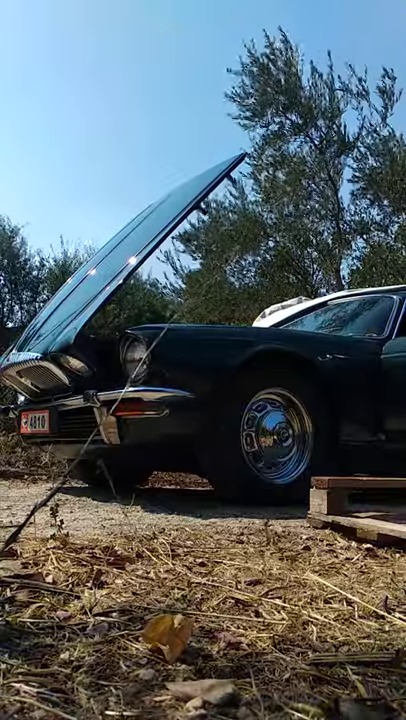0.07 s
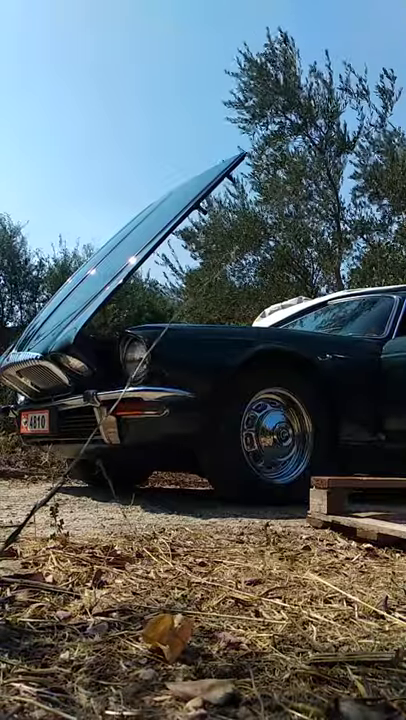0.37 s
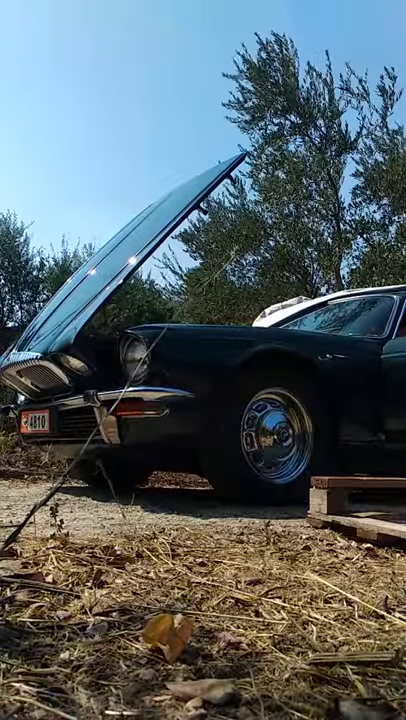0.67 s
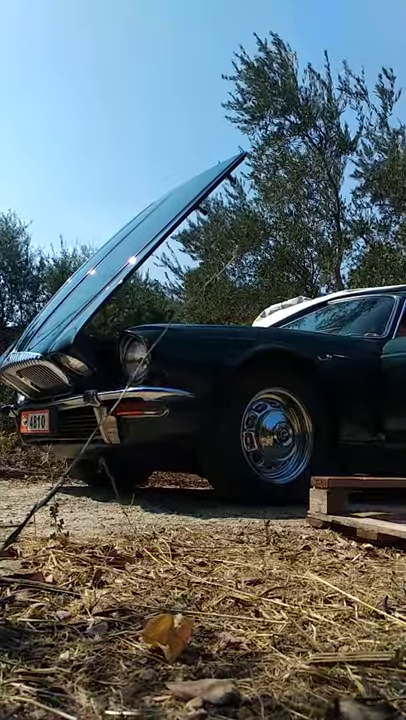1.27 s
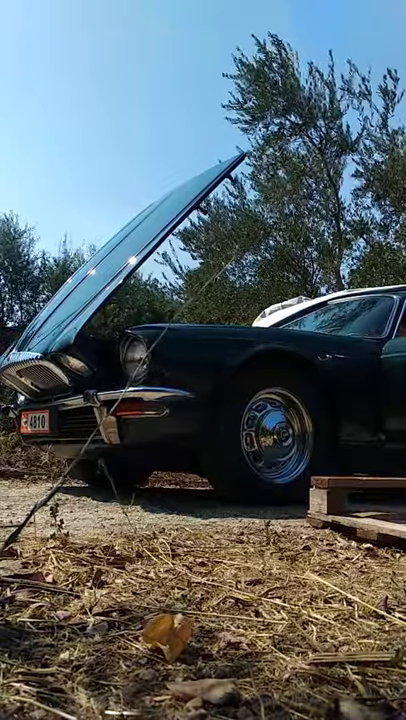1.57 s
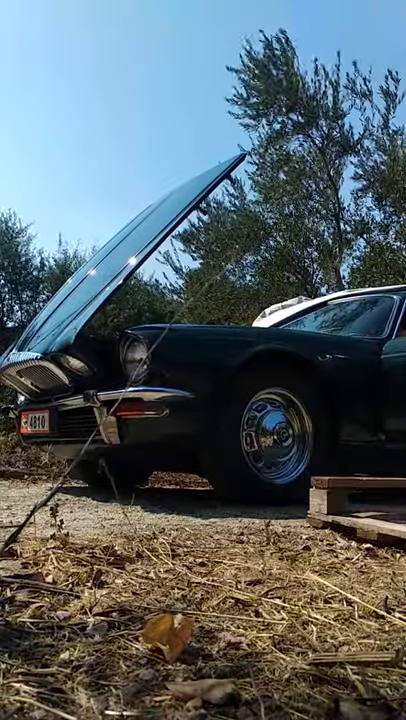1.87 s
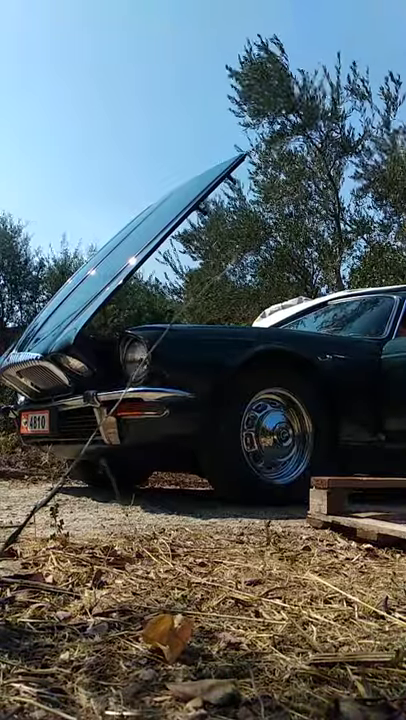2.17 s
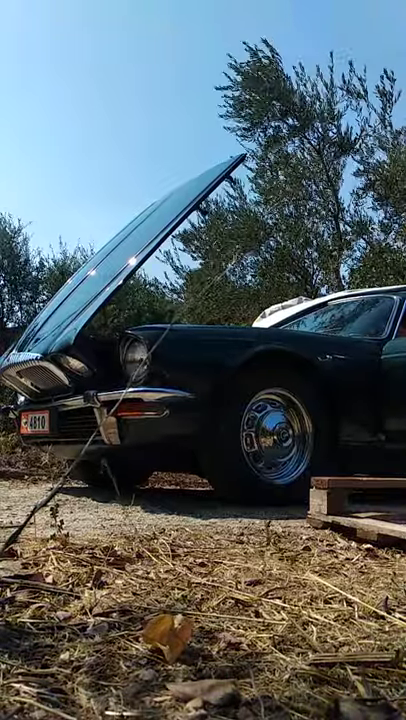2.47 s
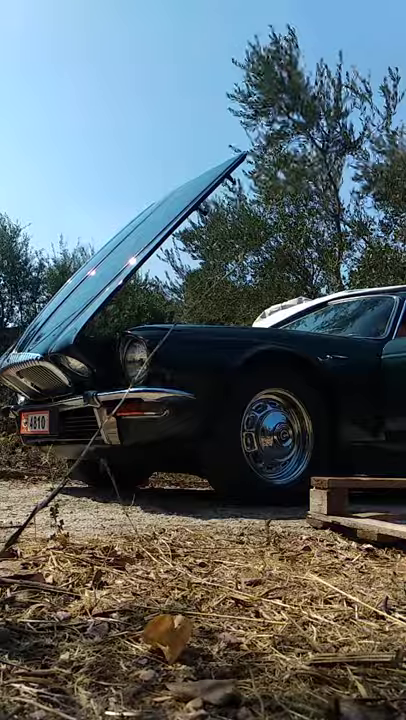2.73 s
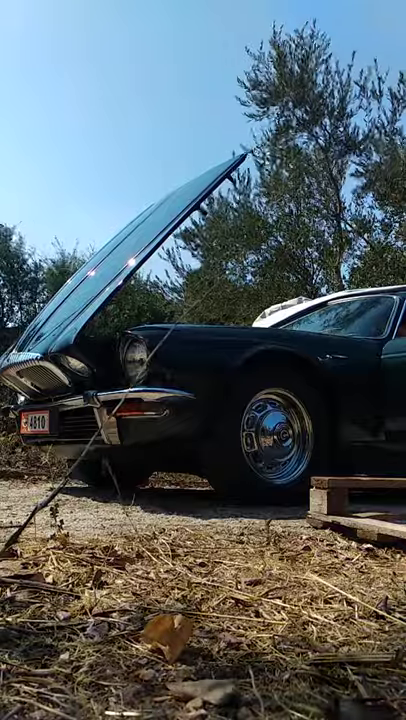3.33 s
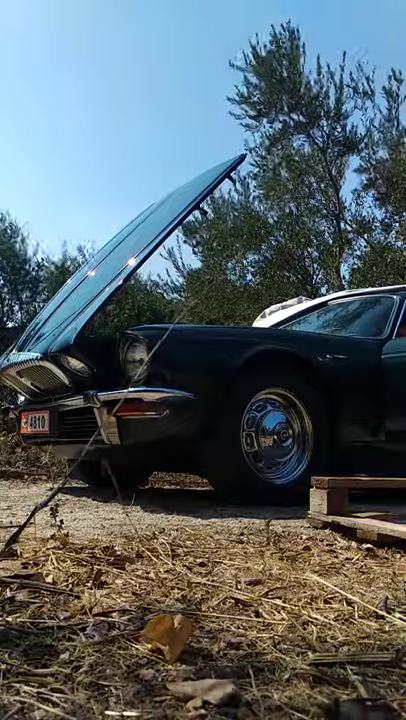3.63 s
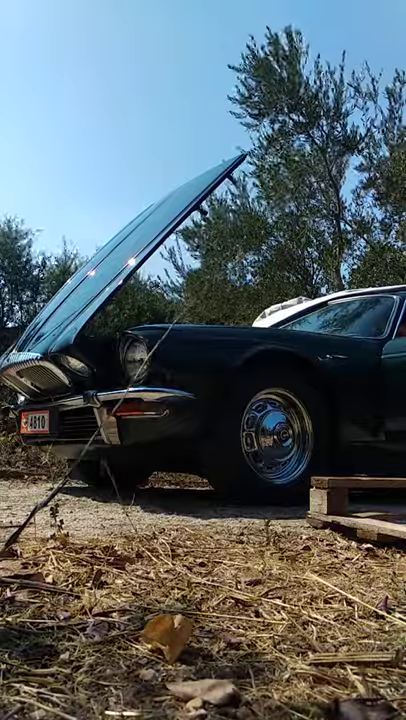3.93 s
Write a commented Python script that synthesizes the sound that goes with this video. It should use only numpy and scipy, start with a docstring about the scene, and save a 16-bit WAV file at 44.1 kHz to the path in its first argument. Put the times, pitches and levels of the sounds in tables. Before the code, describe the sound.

A car's starter motor churns for a second and the engine sputters amid rasping cicadas.

```python
"""Cicadas rasp in the trees to the right, their tymbals clicking over a low distant drone.
An old car stands with its bonnet open; after a few light knocks its starter bangs into mesh and churns.
The gear teeth whine, grind and ring the housing, slowing at every compression of the engine.
The engine coughs, the starter drops out, and a few uneven, weakening firings stumble on."""
import sys
import numpy as np
from scipy import signal
from scipy.fft import rfft, irfft, next_fast_len
from scipy.io import wavfile
from scipy.ndimage import map_coordinates

SR = 44100
rng = np.random.default_rng(int(sys.argv[2]) if len(sys.argv) > 2 else 0)


def store_pcm(level_fs):
    """Save levels as 16-bit WAV."""
    pcm = np.round(np.clip(level_fs, -1, 1) * 32767).astype(np.int16)
    wavfile.write(sys.argv[1], SR, np.atleast_2d(pcm).T)


N = 176400
T = np.arange(N) / SR


def from_db(db):
    """Decibels to gain."""
    return 10 ** (np.asarray(db) / 20)


def unit_rms(x):
    """Scale to unit power."""
    return x / np.sqrt(np.mean(x ** 2) + 1e-20)


def curves(rows):
    """Each column after the time, interpolated at every sample."""
    times, *columns = np.transpose(rows)
    return [np.interp(T, times, column) for column in columns]


def colour(x, spectrum):
    """Minimum-phase filter of unit power gain through (Hz, dB) points, falling away beyond them."""
    size = next_fast_len(N + SR // 2) // 2 * 2
    hz, db = np.transpose(spectrum)
    log_hz = np.log(np.maximum(np.arange(size // 2 + 1) * SR / size, 1))
    outside = np.maximum(np.log(hz[0]) - log_hz, 0) + np.maximum(log_hz - np.log(hz[-1]), 0)
    gain = unit_rms(from_db(np.interp(log_hz, np.log(hz), db) - 20 * outside))
    cepstrum = irfft(np.log(gain))
    cepstrum[1:size // 2] *= 2
    cepstrum[size // 2 + 1:] = 0
    return irfft(rfft(x, size) * np.exp(rfft(cepstrum)))[..., :N]


def drift(rate_hz):
    """Random wander between knots of spread 1."""
    knots = rng.standard_normal(N // 10)
    return map_coordinates(knots, [T * rate_hz + 2], order=1, mode="wrap")


def noise(correlation):
    """Stereo white noise with correlated channels."""
    mid, side = rng.standard_normal((2, N))
    return (np.sqrt(1 + correlation) * mid + np.sqrt(1 - correlation) * side * [[1], [-1]]) / np.sqrt(2)


def pan(left_db):
    """Channel gains, left over right."""
    return from_db([[left_db / 2], [-left_db / 2]])


def ring(x, hz, t60_s):
    """One damped mode."""
    r, w = from_db(-60 / (t60_s * SR)), 2 * np.pi * hz / SR
    return signal.lfilter([np.sqrt(1 - r * r) * np.sin(w)], [1, -2 * r * np.cos(w), r * r], x)


def scatter(x, wet_db, above_hz):
    """Reflections of wandering phase, opposite in the two channels; the bass stays direct."""
    highs = signal.sosfilt(signal.butter(3, above_hz, "high", fs=SR, output="sos"), x)
    reflected = np.real(signal.hilbert(highs) * np.exp(2j * np.pi * drift(7.7)))
    return x + from_db(wet_db) * reflected * np.array([[1], [-1]])


def blows(rows, attack_s, decay_s):
    """Envelope of sudden events that die away."""
    return sum(from_db(db) * np.clip((T - s) / attack_s, 0, 1)
               * np.exp(-np.maximum(T - s - attack_s, 0) / decay_s) for s, db in rows)


def phrases(rows, rise_s, hold_s, fall_s):
    """Rise-hold-fall envelope, each hold centred on its time."""
    corners_s = [-hold_s / 2 - rise_s, -hold_s / 2, hold_s / 2, hold_s / 2 + fall_s]
    return sum(from_db(db) * np.interp(T - s, corners_s, [0, 1, 1, 0]) for s, db in rows)


# Drone spectrum (frequency [Hz], gain [dB])
DRONE_SPECTRUM = [(25,-33),(43,-20),(62,-21),(81,1),(145,-8.5),(185,-8.5),(235,-16),(380,-21.5),(600,-30),(900,-31),(1300,-39),(1900,-76)]
# Hum pitch (time [s], frequency [Hz])
HUM_PITCH = [(0,76.9),(.6,75.8),(1.1,81),(1.6,81.67),(2.1,85.26),(4,87.35)]


def distant_drone():
    """Low noise with a wavering hum and faint air."""
    drone = from_db(-42.5) * colour(noise(correlation=0.93), DRONE_SPECTRUM)
    hum_hz = curves(HUM_PITCH)[0] * (1 + .03 * drift(20))
    hum = from_db(-47 + 2 * drift(12)) * np.sqrt(2) * np.sin(2 * np.pi * np.cumsum(hum_hz) / SR)
    air = colour(noise(correlation=0.02), [(300, -36), (700, -5.0), (1700, -13.5), (4000, -22)])
    return drone + hum + from_db(-61.5) * air


def tymbal(click_hz, jitter, decay_cycles, smear, correlation):
    """A cicada's fast, uneven click train, smeared by foliage."""
    cycle = np.cumsum(click_hz * (1 + jitter * drift(90))) / SR % 1
    return unit_rms(noise(correlation) * (np.exp(-cycle / decay_cycles) + smear))


# Chorus contour (time [s], level [dB])
CHORUS_CONTOUR = [(0,-30),(.45,-32),(.8,-31),(1.3,-32),(2.2,-32.5),(3.1,-31),(3.5,-33),(4,-31.5)]
# Lower voices (frequency [Hz], gain [dB])
LOW_CHORUS_SPECTRUM = [(1900,-23),(2500,-6.5),(3300,-14.5),(3850,-26),(4400,2),(4950,8),(5800,1.5),(7800,2),(8800,-5.5),(11000,-32),(16000,-35)]
# Higher voices (frequency [Hz], gain [dB])
HIGH_CHORUS_SPECTRUM = [(5000,-17.5),(8700,-6),(9800,7.5),(11700,6.5),(13200,2),(14300,-15),(16000,-42)]


def cicada_chorus():
    """Far tymbals blur into two steady bands."""
    def voices(spectrum, click_hz, trim_db):
        clicks = tymbal(click_hz, jitter=.12, decay_cycles=.2, smear=1.5, correlation=-.05)
        level_db = curves(CHORUS_CONTOUR)[0] + trim_db + 1.5 * drift(25)
        return colour(clicks, spectrum) * from_db(level_db)

    low = voices(LOW_CHORUS_SPECTRUM, click_hz=171, trim_db=-2.5)
    high = voices(HIGH_CHORUS_SPECTRUM, click_hz=272, trim_db=-3.5)
    return low * pan(left_db=-2.5) + high * pan(left_db=-3)


# Swell crests (time [s], level [dB])
SWELL_CRESTS = [(.12,-37),(.51,-36.5),(.91,-38.5),(1.325,-35),(1.681,-35),(2.0,-35.5),(2.328,-34),(2.67,-41),(2.989,-36.5),(3.34,-34),(3.685,-34.5),(3.99,-38)]
# Swell spectrum (frequency [Hz], gain [dB])
SWELL_SPECTRUM = [(4000,-37),(6000,-22),(8800,1.5),(10000,-3),(11500,8.5),(12300,4.5),(13500,-8),(16000,-16.5)]


def high_cicada():
    """A high click train swells and breaks off at each crest."""
    hold_s = 0.01
    centres = [(s - hold_s / 2, db) for s, db in SWELL_CRESTS]
    envelope = phrases(centres, rise_s=0.22, hold_s=hold_s, fall_s=0.029)
    clicks = tymbal(click_hz=347, jitter=0.25, decay_cycles=0.38, smear=0.98, correlation=-0.049)
    return colour(clicks, SWELL_SPECTRUM) * envelope * pan(left_db=-13)


# Chirp centres (time [s], level [dB])
CHIRP_CENTRES = [(.13,-35.5),(.235,-36.5),(.41,-35),(.61,-33.5),(.785,-34),(.965,-33),(1.165,-32.5),(1.38,-32),(1.565,-31.5),(1.775,-32),(1.975,-33.5),(2.17,-33.5),(2.37,-34.5),(2.56,-35.5),(2.76,-32),(2.98,-32),(3.2,-31),(3.41,-31),(3.6,-32.5),(3.79,-32.5),(3.985,-32)]
# Chirp spectrum (frequency [Hz], gain [dB])
CHIRP_SPECTRUM = [(1800,-30.5),(2400,-15),(3200,-16.5),(3850,-23),(4400,-2),(4980,0),(5400,0),(6200,-6),(7800,-3.5),(9000,-10),(11500,-10.5),(14000,-21),(16000,-55)]


def near_cicada():
    """Short chirps of tymbal clicks; the hollow abdomen rings."""
    clicks, cavity = (tymbal(click_hz=246, jitter=0.14, decay_cycles=0.67, smear=1, correlation=0.023)
                      for _ in range(2))
    voice = unit_rms(colour(clicks, CHIRP_SPECTRUM) + .42 * ring(cavity, hz=4980, t60_s=.02))
    return voice * phrases(CHIRP_CENTRES, rise_s=.04, hold_s=.075, fall_s=.035) * pan(left_db=-7)


# Knocks at the car (time [s], level [dB])
KNOCK_HITS = [(.05,-45),(.415,-44),(.505,-42.5),(.943,-41)]
# Knock spectrum (frequency [Hz], gain [dB])
KNOCK_SPECTRUM = [(200,2),(450,-2.5),(750,-3.5),(1000,0),(1400,-11),(3000,-13),(8000,-33)]


def knocks():
    """Light, dull bursts of noise."""
    envelope = blows(KNOCK_HITS, attack_s=0.002, decay_s=0.037)
    return colour(noise(correlation=0.93) * envelope, KNOCK_SPECTRUM)


# Rumble contour (time [s], level [dB])
RUMBLE_CONTOUR = [(3.14,-56),(3.2,-41),(3.25,-34),(3.33,-33.5),(3.37,-31.5),(3.48,-35),(3.66,-35),(3.74,-39),(4,-37.5)]
# Rumble spectrum (frequency [Hz], gain [dB])
RUMBLE_SPECTRUM = [(30,-54),(50,-14),(78,2.5),(147,-8.5),(260,-5),(380,-13),(610,-8.5),(980,-17),(1400,-19.5),(2000,-25),(3600,-29.5)]


def engine_rumble():
    """The engine turns over with a fluttering rumble."""
    level_db = curves(RUMBLE_CONTOUR)[0] + 2.6 * drift(70)
    return colour(noise(correlation=.97) * from_db(level_db), RUMBLE_SPECTRUM)


# Jolts on the mounts (time [s], level [dB])
CLATTER_HITS = [(3.262,-34),(3.282,-28),(3.31,-32.5),(3.383,-33),(3.478,-38),(3.53,-37.5),(3.61,-41),(3.688,-33.5),(3.855,-42)]
# Clatter spectrum (frequency [Hz], gain [dB])
CLATTER_SPECTRUM = [(250,-8),(420,3.5),(620,-6),(950,2.5),(1400,0.5),(2200,-11.5),(5000,-23)]


def engine_clatter():
    """The harder firings rattle the engine on its mounts."""
    envelope = blows(CLATTER_HITS, attack_s=0.0017, decay_s=0.016)
    return colour(noise(correlation=0.62) * envelope, CLATTER_SPECTRUM)


# Firings (time [s], puff level [dB], boom level [dB], boom pitch [Hz])
FIRING_EVENTS = [(3.27,-16,-23.5,135),(3.281,-35,-29,254.1),(3.304,-18,-15,118.6),(3.384,-27,-37,109.1),(3.435,-47,-27,139),(3.475,-22.5,-22.5,160),(3.526,-25,-20,165),(3.584,-28,-21.5,187.8),(3.617,-28,-27,119.5),(3.651,-37,-25.5,141),(3.685,-26,-22.5,152),(3.776,-38,-33,166.6),(3.815,-38,-28,98),(3.855,-34,-24,160),(3.911,-41,-25.5,119.2),(3.951,-52,-47,101),(3.985,-44,-34,194)]
# Puff spectrum (frequency [Hz], gain [dB])
PUFF_SPECTRUM = [(35,-44),(58,-22),(85,17),(150,-2.5),(260,4),(380,-5.5),(600,-9),(1000,-17.5),(2000,-31),(6000,-36)]


def engine_firings(crest_s=.0065):
    """Each firing puffs gas and swings the exhaust for a few cycles."""
    booms = np.zeros(N)
    for s, _, db, hz in FIRING_EVENTS:
        age_s = np.maximum(T - s, 0)
        swing = age_s / crest_s * np.exp(1 - age_s / crest_s)
        booms += from_db(db) * swing * np.sin(2 * np.pi * hz * age_s)
    puffs = blows([row[:2] for row in FIRING_EVENTS], attack_s=0.0046, decay_s=0.013)
    return booms + colour(noise(correlation=1) * puffs, PUFF_SPECTRUM)


# Faint lead-in, bang and rebounds (time [s], level [dB])
BANG_BURSTS = [(2.269,-37),(2.281,-24),(2.293,-31),(2.305,-31)]
# Bang spectrum (frequency [Hz], gain [dB])
BANG_SPECTRUM = [(100,-12),(195,4),(290,-1),(450,5),(850,0),(1500,0),(2800,-14),(4000,-10),(9000,-19),(16000,-40)]


def pinion_bang():
    """A faint lead-in, then the pinion bangs in and rebounds; returns raw impact and bang."""
    impact = rng.standard_normal(N) * blows(BANG_BURSTS, attack_s=.001, decay_s=.012)
    return impact, colour(impact, BANG_SPECTRUM)


# Scrape centres (time [s], level [dB], mode frequency [Hz])
SCRAPE_CENTRES = [(2.375,-39,2290),(2.475,-36,2740),(2.535,-33,2250),(2.685,-41,1150),(2.75,-36,2640),(2.86,-41,1770),(2.885,-30.5,1086),(2.995,-32.5,2173),(3.015,-31,2306),(3.105,-34.5,1307),(3.135,-35.5,2780)]


def tooth_scrapes():
    """Each scrape sets a different mode singing."""
    return sum(unit_rms(ring(rng.standard_normal(N), hz, t60_s=0.06))
               * phrases([(s, db)], rise_s=0.011, hold_s=0.036, fall_s=0.018)
               for s, db, hz in SCRAPE_CENTRES)


def tooth_grind(mesh_cycles):
    """Uneven tooth strikes plus pulsed rubbing; three signals sharing the strikes."""
    tooth = np.floor(mesh_cycles + .045 * drift(400))
    strikes = unit_rms(np.diff(tooth, prepend=tooth[0]) * from_db(0.71 * rng.standard_normal(N)))
    pressure = unit_rms((np.exp(-(mesh_cycles % 1) / 0.6) + 0.7) * from_db(2.2 * drift(160)))
    return .52 * strikes + .85 * pressure * rng.standard_normal((3, N))


# Whine contour (time [s], mesh tone level [dB], overtone level [dB])
WHINE_CONTOUR = [(2.29,-35,-44),(2.34,-40,-43),(2.38,-35.5,-37),(2.435,-29.5,-35.5),(2.465,-44,-42),(2.505,-36,-37),(2.55,-28,-37),(2.585,-41,-38),(2.65,-39,-42),(2.695,-48,-57),(2.72,-46,-39),(2.757,-28.5,-38),(2.795,-33,-36),(2.825,-46,-46),(2.85,-33,-38),(2.875,-40,-32.5),(2.91,-44,-38),(2.955,-38,-46),(3.0,-51,-31.5),(3.03,-36,-38),(3.075,-62,-59),(3.11,-50,-38),(3.15,-36,-46),(3.21,-58,-42),(3.4,-61,-43)]
# Overtones (multiple of mesh rate [1], gain [dB])
WHINE_OVERTONES = [(2,-0.5),(3,-2),(4,-11),(5,-5.5),(6,-19),(7,-7),(8,-14),(9,-19)]


def gear_whine(mesh_cycles, engaged, jitter_cycles=.045):
    """Returns the mesh tone and its overtones, which backlash roughens."""
    tone_gain, overtone_gain = from_db(curves(WHINE_CONTOUR)) * engaged
    overtones = np.zeros(N)
    for k, db in WHINE_OVERTONES:
        gain = from_db(db + 1.9 * drift(50))
        cycles = k * mesh_cycles + rng.random() + jitter_cycles * np.sqrt(k) * drift(250)
        overtones += gain * np.sin(2 * np.pi * cycles)
    tone = from_db(2 * drift(70)) * np.sin(2 * np.pi * mesh_cycles)
    return tone_gain * unit_rms(tone), overtone_gain * unit_rms(overtones)


# Starter and bell housing modes (frequency [Hz], gain [dB], t60 [s])
HOUSING_MODES = [(207.4,5,0.3),(362,-5,.1),(493,-2,0.12),(605.3,-2,0.35),(736,-2.5,0.12),(837,2.5,0.19),(945,-3,0.19),(1067,1.5,0.14),(1118,-2,0.095),(1266,-6.5,.08),(1526,3.5,0.064),(2190,6,0.12),(2330,8,0.12),(2520,-2,.1),(2614,5,0.085),(2820,4,0.088)]


def housing_ring(growl_drive, rasp_drive, impact, split_hz=1800, flicker_db=3.5):
    """The growl drives the low modes, the rasp the high ones, the impact all."""
    ringing = np.zeros(N)
    for hz, db, t60_s in HOUSING_MODES:
        grind = (rasp_drive if hz > split_hz else growl_drive) * from_db(flicker_db * drift(20))
        ringing += from_db(db) * ring(grind + from_db(-3) * impact, hz, t60_s)
    return ringing / np.sqrt(len(HOUSING_MODES))


# Mesh rate, sagging at each compression (time [s], rate [Hz])
MESH_RATE = [(2.28,164.9),(2.335,180.2),(2.385,208.7),(2.435,219.8),(2.47,293.8),(2.505,339),(2.545,222.6),(2.58,165.6),(2.62,177.5),(2.68,199.3),(2.716,421.1),(2.757,348.5),(2.785,268.5),(2.812,267.7),(2.845,456),(2.875,366.9),(2.9,315.8),(2.935,329.5),(2.968,430.5),(3.0,357.6),(3.03,305.5),(3.06,290.4),(3.09,440),(3.125,358.2),(3.16,312.9),(3.2,291.7),(3.26,452.2),(3.42,518.5)]
# Gear load, surging at each compression (time [s], growl level [dB], rasp level [dB])
GEAR_LOAD = [(2.29,-27,-43),(2.338,-34,-43),(2.378,-28,-41),(2.402,-33,-40),(2.44,-31.5,-37.5),(2.458,-32,-34.5),(2.5,-30,-32),(2.546,-26.5,-38),(2.6,-31.5,-45),(2.645,-36.5,-44.5),(2.68,-29.5,-34),
             (2.704,-49,-48),(2.718,-26.5,-33.5),(2.742,-31.5,-32),(2.78,-26,-36.5),(2.808,-31,-36.5),(2.832,-41,-38),(2.852,-28,-33.5),(2.876,-24.5,-32.5),(2.915,-29.5,-38.5),(2.955,-34.5,-39.5),(2.978,-29,-32),(3.004,-24.5,-29.5),
             (3.035,-30.5,-32.5),(3.058,-32,-43),(3.084,-43,-41),(3.1,-27.5,-32),(3.15,-28.5,-34.5),(3.185,-31,-34.5),(3.218,-38,-39),(3.278,-28.5,-36),(3.352,-38,-40),(3.39,-24.5,-35),(3.426,-51,-58),(3.44,-50,-56)]
# Growl spectrum (frequency [Hz], gain [dB])
GROWL_SPECTRUM = [(120,-29.5),(200,6.5),(350,6.5),(560,3),(820,3.5),(1120,-6),(1400,-1.5),(1700,2),(2100,-3.5),(4000,-55.5)]
# Rasp spectrum (frequency [Hz], gain [dB])
RASP_SPECTRUM = [(1200,-22),(1900,-18.5),(2350,-1),(2850,0),(3300,-6),(3800,-6),(4100,-14.5),(6500,-3.5),(9000,-8.5),(13000,-16.5),(16000,-33)]


def starter(engage_s=2.279, release_s=3.41, run_down_s=0.033, teeth_per_turn=5.4, wobble_db=1.5):
    """Teeth strike at the mesh rate; the shaft runs out of true, so they bite harder once a turn."""
    engaged = np.clip((T - engage_s) / .01, 0, 1) * np.exp(-np.maximum(T - release_s, 0) / run_down_s)
    mesh_hz = curves(MESH_RATE)[0] * (1 + .02 * drift(150))
    mesh_cycles = np.cumsum(mesh_hz) / SR
    wobble = unit_rms(from_db(wobble_db * np.sin(2 * np.pi * mesh_cycles / teeth_per_turn)))
    growl_gain, rasp_gain = from_db(curves(GEAR_LOAD)) * engaged * wobble
    low_grind, high_grind, housing_grind = tooth_grind(mesh_cycles)
    growl = from_db(-5.5) * colour(low_grind * growl_gain, GROWL_SPECTRUM)
    rasp = from_db(3.5) * colour(high_grind * rasp_gain, RASP_SPECTRUM)
    tone, overtones = gear_whine(mesh_cycles, engaged)
    impact, bang = pinion_bang()
    housing = from_db(-2) * housing_ring(housing_grind * growl_gain, housing_grind * rasp_gain, impact)
    metal = growl + rasp + overtones * wobble + tooth_scrapes() + bang + housing
    return (scatter(metal, wet_db=-2.5, above_hz=1100) + tone) * pan(left_db=0.4)


def scene():
    """The car among the cicadas."""
    cicadas = near_cicada() + high_cicada() + cicada_chorus()
    cranking = starter()
    engine = (engine_firings() + engine_rumble() + engine_clatter()) * pan(left_db=-0.6)
    return distant_drone() + cicadas + knocks() + engine + cranking


def record(dry, low_cut_hz=60, high_cut_hz=15750):
    """Gentle bass roll-off, steep top cut."""
    thinned = signal.sosfilt(signal.butter(2, low_cut_hz, "high", fs=SR, output="sos"), dry)
    return signal.sosfilt(signal.ellip(10, .2, 80, high_cut_hz, fs=SR, output="sos"), thinned)


dry = scene()
out = record(dry)
store_pcm(out)
```